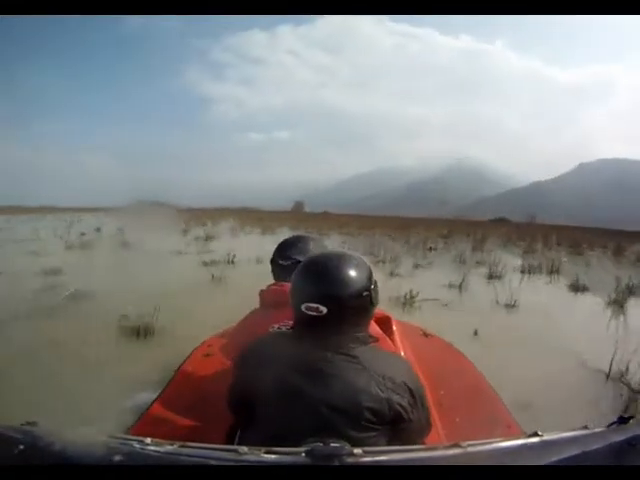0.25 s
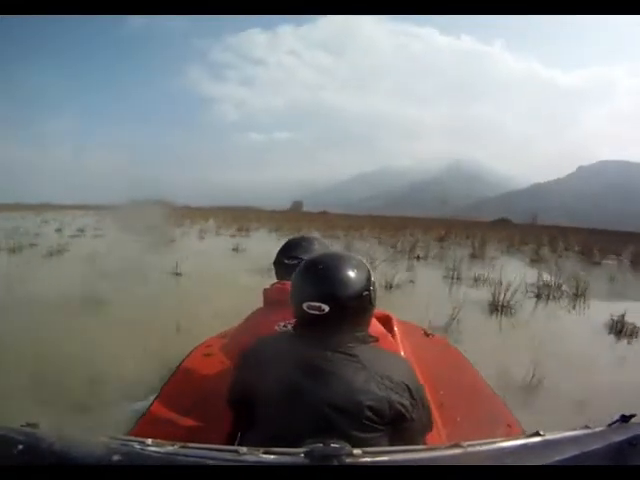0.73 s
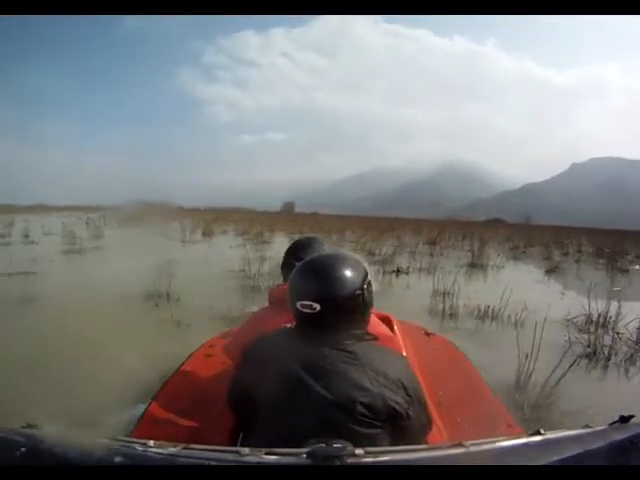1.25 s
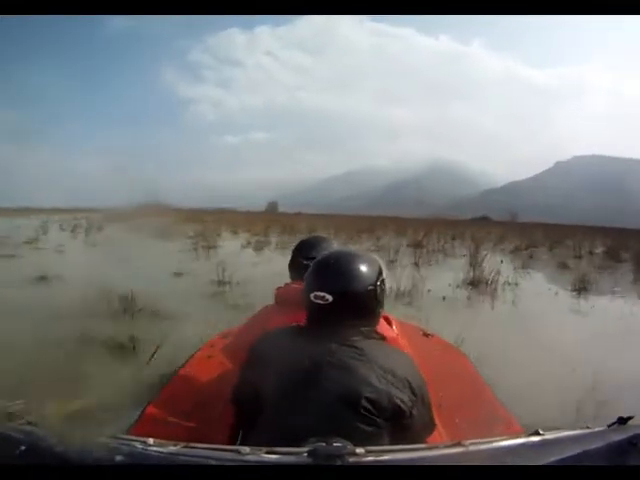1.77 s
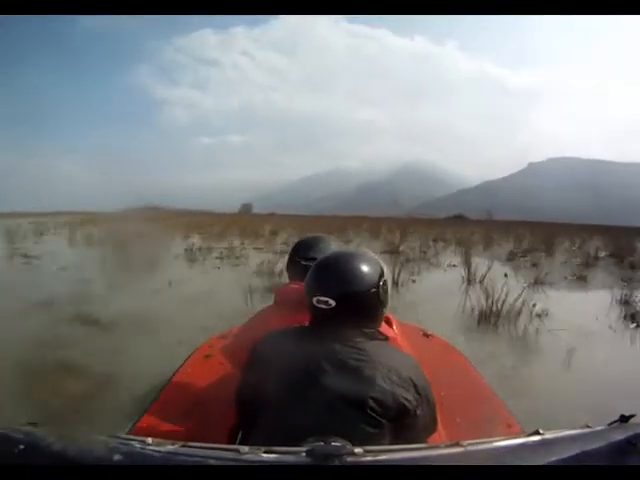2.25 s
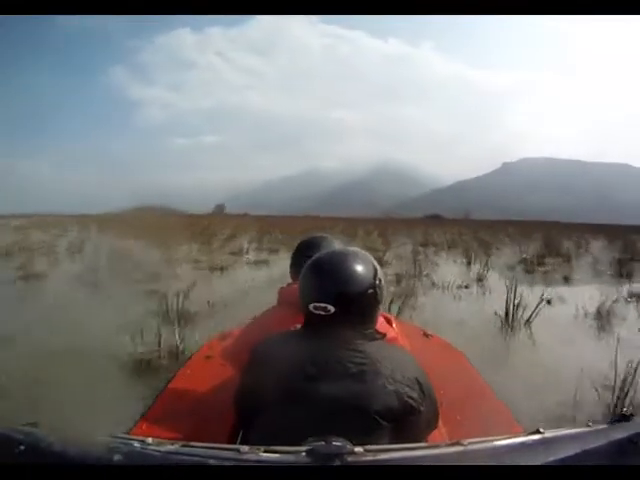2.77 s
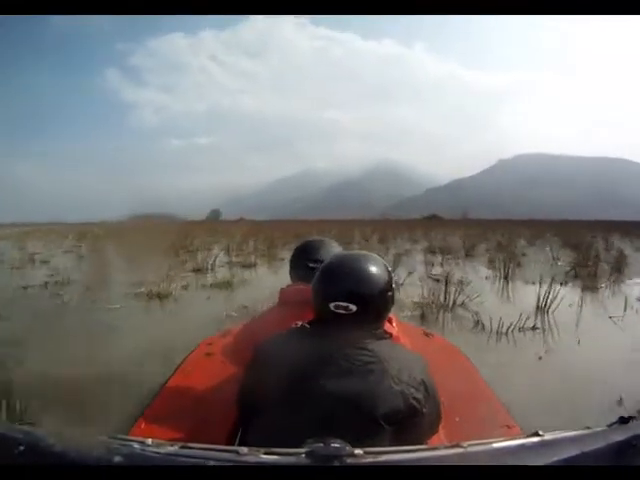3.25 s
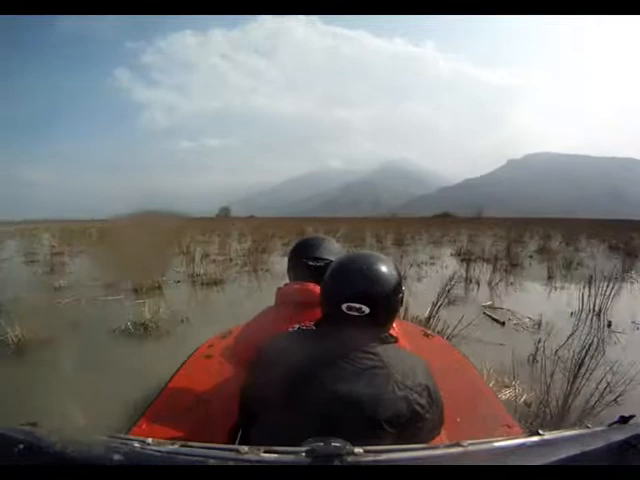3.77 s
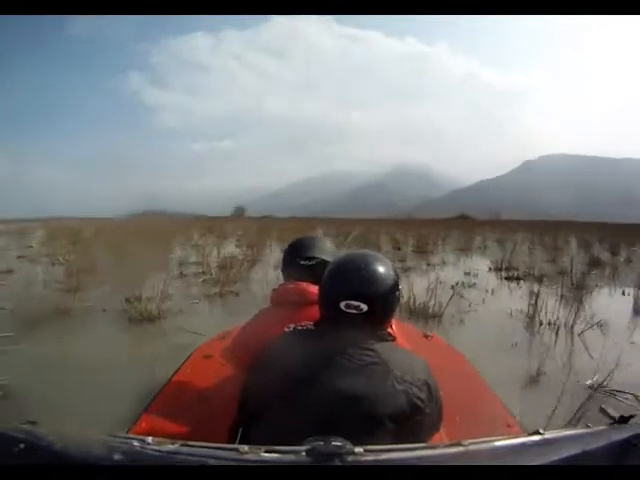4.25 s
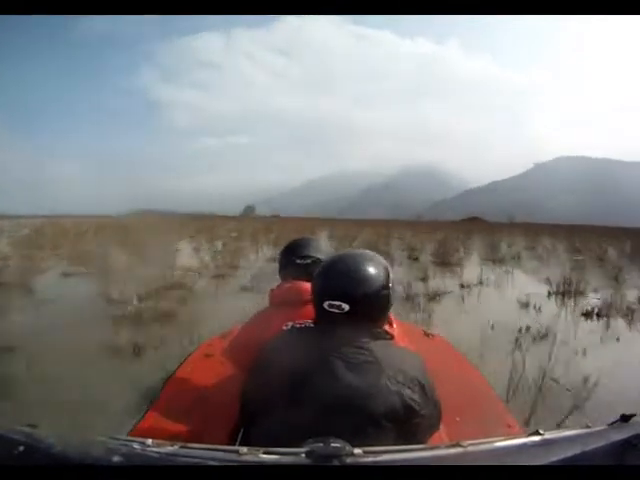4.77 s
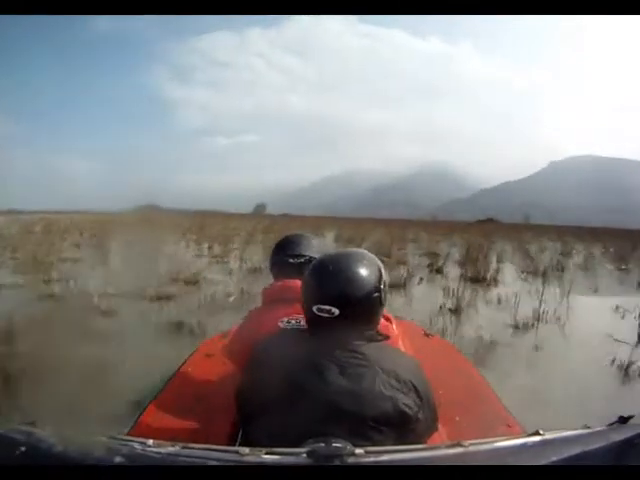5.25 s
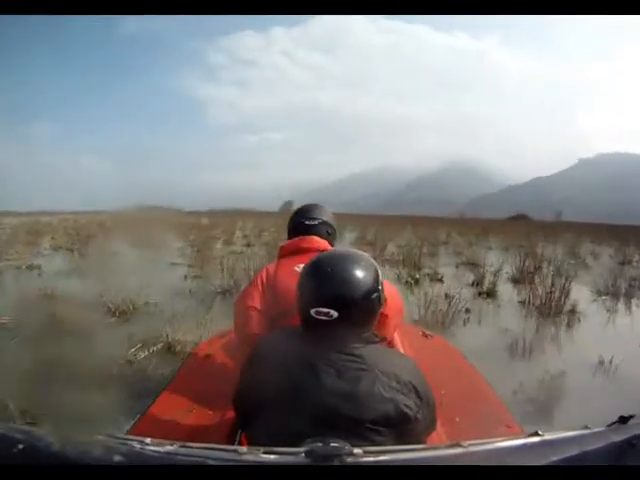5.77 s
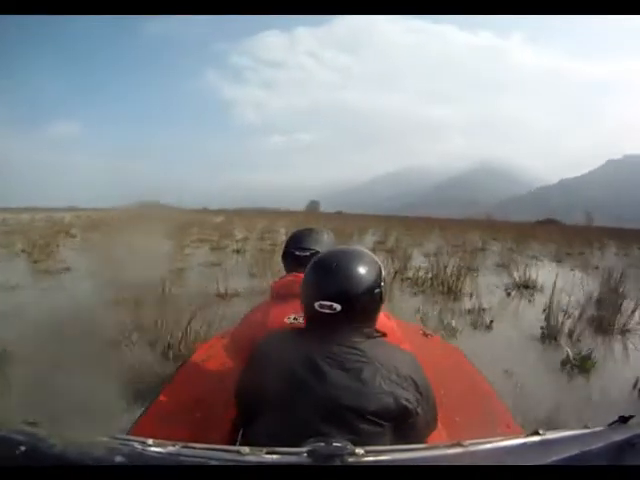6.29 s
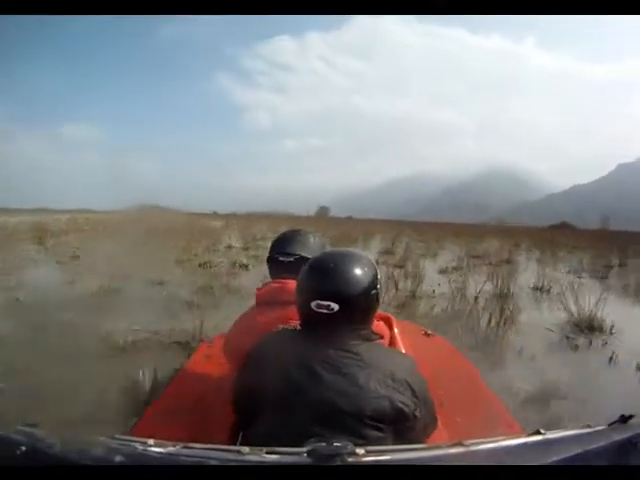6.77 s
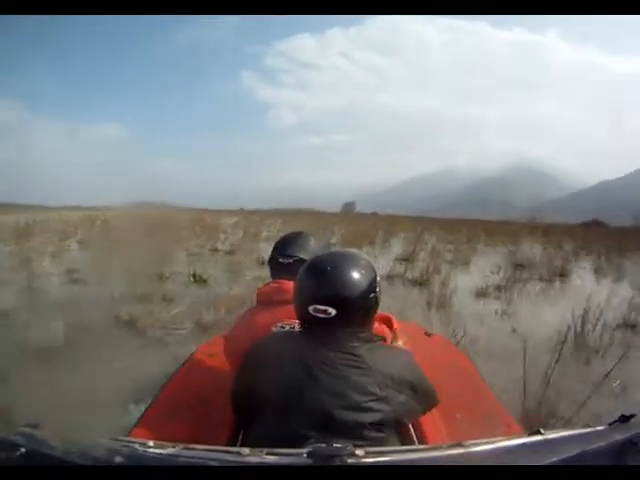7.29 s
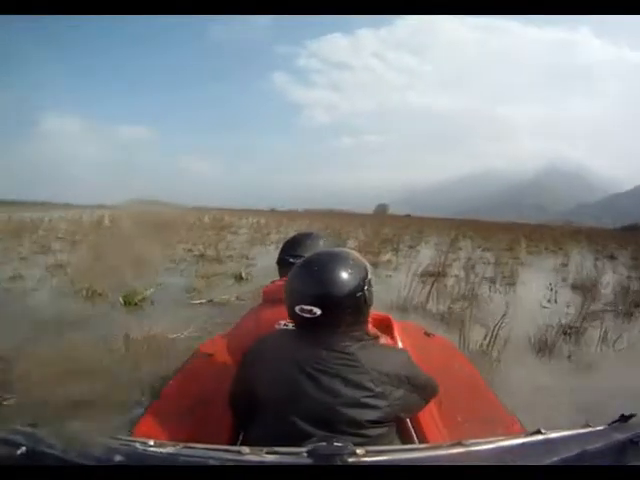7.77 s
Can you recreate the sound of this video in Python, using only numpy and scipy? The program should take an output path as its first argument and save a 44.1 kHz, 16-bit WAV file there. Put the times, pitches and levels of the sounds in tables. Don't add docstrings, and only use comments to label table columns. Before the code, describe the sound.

A continuous, dense engine roar with low thumping, firing buzz and throbbing fan-blade tone. It starts wide open, drops a couple of semitones with less whine and rattle, stays uneven for a few seconds, then swells up again to full power and barely relaxes at the end. Outdoors on a moving hovercraft, the hull-mounted microphone in a sealed case sounds hard, ringing and distorted, with chattering mount parts.

```python
import sys
import numpy as np
from scipy import signal
from scipy.io import wavfile
from scipy.ndimage import uniform_filter1d

SR = 44100
rng = np.random.default_rng(int(sys.argv[2]) if len(sys.argv) > 2 else 0)


def attenuation_scalar(level_db):
    decades = np.asarray(level_db, float) / 20
    return 10 ** decades


def wav_record(signal):
    frames = np.transpose(np.atleast_2d(signal))
    bounded = np.clip(frames, -1, 1)
    quanta = np.round(bounded * 32767).astype(np.int16)
    wavfile.write(sys.argv[1], SR, quanta)


N = 354123
T = np.arange(N) / SR
COARSE = np.arange(N // 100 + 2) * 100 / SR

# start_s, crank_hz
CRANK_SPEED = [(0, 72.25), (.5, 72.55), (1.4, 72.92), (1.6, 72.5), (2.05, 66.8), (2.45, 63.95), (2.6, 63.6),
               (3.1, 63.2), (3.4, 62.42), (4.25, 62.52), (4.5, 63.3), (5.1, 70.5), (5.4, 72.3),
               (5.75, 73.05), (6.3, 73.35), (6.65, 73.0), (7.0, 72.25), (8.03, 71.44)]
OPEN_SPEED, EASED_SPEED = 72.8, 62.6
# start_s, opening (0-1)
THROTTLE = [(0, 0.99), (.75, 0.95), (1.4, 0.98), (1.715, .9), (1.735, 0.67), (2, 0.36), (2.3, .37),
            (2.7, 0), (3.5, 0.05), (4.4, 0.04), (4.8, 0.52), (5.13, .62), (5.17, 0.73), (5.35, .97),
            (5.55, 1.04), (6.3, 1), (7.45, 0.94), (8.03, 0.68)]
# crank_hz, thump_db, firing_db, blade_db
HULL = [
    (62.8, -18, -22.5, -23.5),
    (65.7, -19, -25.5, -19),
    (64.5, -22, -20.5, -23),
    (72.5, -21.5, -20, -22.5),
    (74.1, -19, -21.5, -24.5),
]
# multiple, open_db (rms), eased_db (rms)
ORDERS = [(3, -29, -31), (4, -29, -29), (6, -31, -44), (7, -27, -53), (8, -39, -53), (9, -32, -53),
          (10, -30, -48), (11, -34, -37), (12, -44, -37), (13, -33, -57), (14, -34, -46), (16, -39, -51),
          (17, -47, -43), (19, -38, -46), (20, -37, -47), (21, -46, -42), (22, -29, -44), (23, -34, -53),
          (24, -25, -47), (25, -35, -47), (26, -31, -41), (27, -41, -51), (28, -47, -43), (29, -45, -44),
          (30, -38, -48), (31, -42, -66), (32, -39, -55), (33, -45, -53), (35, -49, -41), (37, -43, -52)]
FAINT_OPEN_DB, FAINT_EASED_DB, TOP_ORDER = -48, -59, 40
# pitch_hz, width_hz, gain_db
PIPE = [
    (486, 40, 15),
    (538, 50, 38),
    (725, 40, 2),
    (980, 70, 8),
    (1730, 120, 6),
    (2215, 150, 13),
]
BURST_TURNS, SCATTER = .27, .8
PULL_DB, PULL_HZ_PER_S = 2, 14
GEAR, BLADES = .3878, 9
BEAT_PHASE = 2.61
# pitch_hz, level_db (per Hz)
ROAR_OPEN = [(25, -64), (100, -53.5), (180, -55.5), (240, -53.5), (340, -59.5), (530, -58), (740, -58),
             (1020, -53), (1290, -64.5), (1720, -50.5), (2060, -66.5), (2320, -69), (3100, -75.5),
             (4600, -85.5)]
# pitch_hz, level_db (per Hz)
ROAR_EASED = [(25, -61), (100, -62.5), (180, -49.5), (240, -51.5), (340, -60.5), (530, -57.5), (740, -63),
              (1020, -58), (1290, -69.5), (1720, -67.5), (2060, -73), (2320, -77), (3100, -83.5),
              (4600, -94.5)]
# pitch_hz, width_hz, gain_db
CASE = [
    (548, 49, 6.5),
    (2280, 53, 13.5),
    (2660, 160, 7),
    (3660, 100, 7),
    (1460, 40, 2),
    (6570, 2400, 3.5),
]
# pitch_hz, level_db (rms)
FINS = [
    (2900, -61),
    (3700, -66),
    (4060, -69),
    (4140, -59),
    (4230, -70),
    (5400, -75),
    (6750, -78),
]
# pitch_hz, level_db, t60_s
PARTS = [
    (3700, 1, .014),
    (4150, -3, .02),
    (5650, -6, .009),
    (6330, -4, .011),
]
# start_s, peak_db
KNOCKS = [(1.852, -18), (1.923, -22), (2.011, -15), (2.039, -39), (2.072, -23), (2.301, -18), (2.39, -23),
          (2.536, -18), (3.117, -16), (3.154, -24), (3.437, -18), (3.531, -24), (3.92, -26)]
MIRROR_HZ = 12000
# pitch_hz, share (of slope)
FOLDS = [
    (3900, .28),
    (8100, .33),
]


def evened(x):
    return x / np.sqrt(np.mean(abs(x) ** 2) + 1e-20)


def curve(rows, axis):
    return np.interp(T, [r[0] for r in rows], [r[axis] for r in rows])


def fine(v):
    return np.interp(T, COARSE, v)


def coarse_speed():
    return np.interp(COARSE, *np.transpose(CRANK_SPEED))


def read(points, hz):
    f, value = np.transpose(points)
    return np.interp(np.log(hz + 1), np.log(f + 1), value)


def wander(hz, count=1):
    steps = rng.standard_normal((count, len(COARSE) + 600))
    lowpass = signal.butter(2, np.clip(hz, .5, 200), fs=SR / 100, output="sos")
    steps = signal.sosfilt(lowpass, steps)[:, 600:]
    return steps / steps.std(1, keepdims=True)


def ring(x, hz, width):
    return signal.lfilter(*signal.iirpeak(hz, hz / width, SR), x)


def hull_db(axis):
    speed = uniform_filter1d(coarse_speed(), 60, mode="nearest")
    return np.interp(speed, [r[0] for r in HULL], [r[axis] for r in HULL])


def pipe_db(hz):
    return sum(db / (1 + (2 * (hz - f) / width) ** 2) for f, width, db in PIPE)


def exhaust(crank, throttle):
    speed = coarse_speed()
    share = np.interp(COARSE, T, throttle) ** 1.2
    climb = uniform_filter1d(np.gradient(speed, COARSE), 60)
    pull = PULL_DB * np.clip(climb / PULL_HZ_PER_S, 0, 1) ** 3
    thump, firing = wander(3, count=2)
    low = -fine(attenuation_scalar(hull_db(axis=1) - 0.53 * pull + .5 * thump)) * np.cos(crank)
    low -= fine(attenuation_scalar(hull_db(axis=2) + pull + 0.21 * firing)) * np.cos(2 * crank - .6)

    orders = range(3, TOP_ORDER + 1)
    strong = {k: both for k, *both in ORDERS}
    level, slip = wander(6, count=len(orders)), wander(6, count=len(orders))
    start = rng.uniform(-1, 1, len(orders))
    unsteady = 1.7 - .5 * np.minimum(share, 1)
    upper = np.zeros(N)
    for i, k in enumerate(orders):
        open_db, eased_db = strong.get(k, (FAINT_OPEN_DB, FAINT_EASED_DB))
        opened = open_db + 0.18 - pipe_db(k * OPEN_SPEED)
        eased = eased_db - pipe_db(k * EASED_SPEED)
        mix = share ** max(1, k / 18)
        db = mix * opened + (1 - mix) * eased + pipe_db(k * speed)
        db = db + min(k / 8, 1) * unsteady * level[i]
        drift = SCATTER * (1 if k < 12 else 1.9) * start[i]
        drift -= 2 * np.pi * BURST_TURNS * k * (k > 4)
        drift = drift + min(.02 * k, .2) * unsteady * slip[i]
        upper -= fine(attenuation_scalar(db)) * np.cos(k * crank + fine(drift))
    shaft = GEAR * crank
    upper *= 1 + (.28 - .2 * np.minimum(throttle, 1)) * np.cos(shaft) + .2 * np.cos(BLADES * shaft)
    return np.sqrt(2) * (low + upper)


def fan(crank, throttle):
    blade = BLADES * GEAR * crank + 2.26
    level, slip = wander(24.5, count=2)
    tone = -np.cos(blade + fine(.13 * slip)) * fine(attenuation_scalar(1.0 * level))
    over = np.zeros(N)
    for k, db, rise_db in [(2, -8, 18), (3, -17, 10), (4, -13, 22)]:
        over += attenuation_scalar(db + rise_db * (throttle - 1)) * np.cos(k * (blade + 1 + BEAT_PHASE / 2))
    over += attenuation_scalar(-14.5 + 7.7 * (throttle - 1)) * np.cos(blade + 2 * crank)
    wobble = attenuation_scalar(-56 + 8 * throttle) * np.cos(GEAR * crank)
    return np.sqrt(2) * (fine(attenuation_scalar(hull_db(axis=3))) * (tone + over) + wobble)


def roar(crank, throttle):
    hz, t, z = signal.stft(rng.standard_normal(N), SR, nperseg=1024, noverlap=768)
    share = np.interp(t, T, throttle)
    patches = uniform_filter1d(rng.standard_normal(z.shape), 8, 0)
    patches = evened(uniform_filter1d(patches, 8, 1))
    db = read(ROAR_OPEN, hz)[:, None] * share + read(ROAR_EASED, hz)[:, None] * (1 - share)
    coloured = z * attenuation_scalar(db + 1.02 * patches)
    air = signal.istft(coloured, SR, nperseg=1024, noverlap=768)[1][:N] * np.sqrt(SR / 2)
    air = signal.sosfilt(signal.butter(1, 7000, fs=SR, output="sos"), air)
    bass = signal.sosfilt(signal.butter(2, 350, fs=SR, output="sos"), air)
    firing = crank / np.pi + 0.36
    count = firing.astype(int)
    strength = attenuation_scalar(2.3 * rng.standard_normal(int(firing[-1]) + 2))[count]
    puff = 1.8 + strength * (1 + 0.84 * (count % 2)) * np.exp(-(firing % 1) / 2.2)
    puff = uniform_filter1d(puff, 50) * (1 + 0.033 * np.cos(GEAR * crank))
    flutter = fine(attenuation_scalar(0.28 * wander(36)[0] + 0.38 * wander(9.5)[0]))
    return attenuation_scalar(1.0) * (bass + (air - bass) * evened(puff * flutter))


def whine(crank, throttle):
    orders, speed = np.arange(41, 93), coarse_speed()
    level, chance = wander(5, count=len(orders)), rng.standard_normal((len(orders), 2))
    out = np.zeros(N)
    for k, drift, (a, b) in zip(orders, level, chance):
        db = read(FINS, k * speed) + 3 * a + 2.5 * drift
        out += fine(attenuation_scalar(db)) * np.cos(k * crank + 9 * b)
    return np.sqrt(2) * attenuation_scalar(13.3 * (throttle - 1)) * out


def rattle(shake, throttle):
    swing = ring(shake, 2300, 1300)
    swing /= np.sqrt(uniform_filter1d(swing ** 2, 9000))
    contact = np.tanh(np.maximum(swing - .7, 0)) * np.minimum(T / .02, 1)
    t = np.arange(600) / SR
    parts = sum(attenuation_scalar(db - 60 * t / t60) * np.sin(2 * np.pi * hz * t) for hz, db, t60 in PARTS)
    chatter = signal.oaconvolve(contact, parts)[:N]
    chatter = signal.sosfilt(signal.butter(6, 3200, "highpass", fs=SR, output="sos"), chatter)
    return attenuation_scalar(-41 + 6.6 * (throttle - 4)) * evened(chatter)


def knocks():
    out, t = np.zeros(N), np.arange(500) / SR
    for s, db in KNOCKS:
        dull = np.sin(2 * np.pi * rng.uniform(480, 830) * t)
        blow = np.exp(-t / 0.0017) * (dull + 0.27 * rng.standard_normal(len(t)))
        blow = signal.sosfilt(signal.butter(2, 1500, fs=SR, output="sos"), blow)
        at = round(s * SR)
        out[at:at + len(t)] -= attenuation_scalar(db + 7) * blow / abs(blow).max()
    return out


def scene():
    speed = uniform_filter1d(curve(CRANK_SPEED, axis=1), 5000, mode="nearest")
    speed = speed * (1 + .0004 * fine(wander(5)[0]))
    crank = 2 * np.pi * np.cumsum(speed) / SR + 2.4
    throttle = np.clip(curve(THROTTLE, axis=1), 0, 1.3)
    air = roar(crank, throttle)
    air += sum((attenuation_scalar(db) - 1) * ring(air, hz, width) for hz, width, db in CASE)
    craft = exhaust(crank, throttle) + fan(crank, throttle) + air + whine(crank, throttle) + knocks()
    return (craft + rattle(craft, throttle))[None]


def band_limit(x):
    return signal.sosfilt(signal.butter(12, 15710, fs=SR, output="sos"), x)


def record(dry):
    x = 1.3 * np.tanh(dry / 1.3) - .07 * (dry ** 2 - np.mean(dry ** 2))
    slope = np.diff(x, prepend=x[:, :1])
    mirror = 1.435 * slope * np.cos(2 * np.pi * MIRROR_HZ * T)
    mirror += slope * sum(share * np.cos(2 * np.pi * hz * T) for hz, share in FOLDS)
    mirror = signal.sosfilt(signal.butter(2, 14500, fs=SR, output="sos"), mirror)
    start = np.minimum(T / .001, 1)
    return band_limit((x + mirror) * start)


dry = scene()
out = record(dry)
wav_record(out)
```